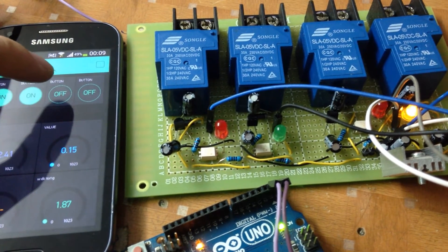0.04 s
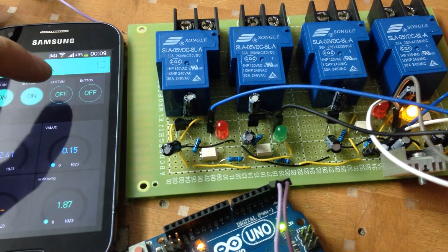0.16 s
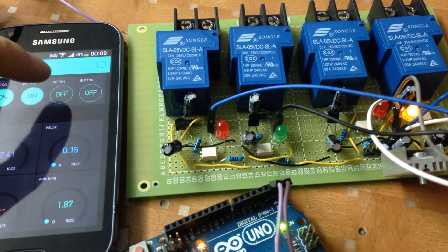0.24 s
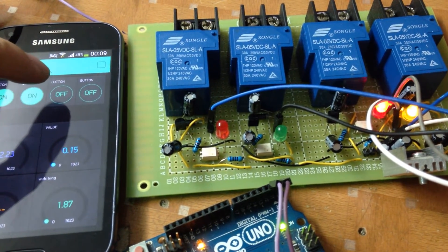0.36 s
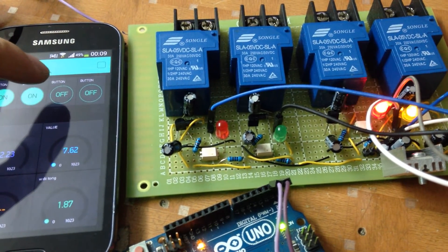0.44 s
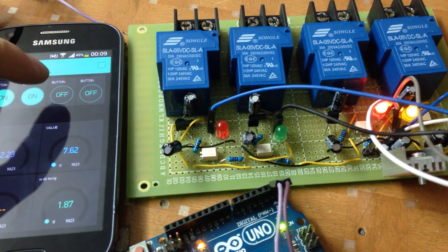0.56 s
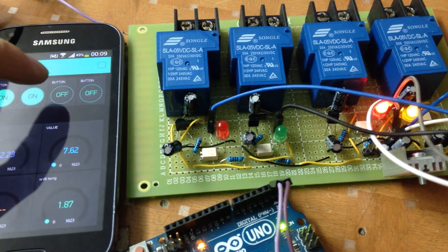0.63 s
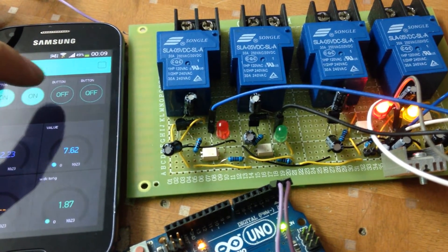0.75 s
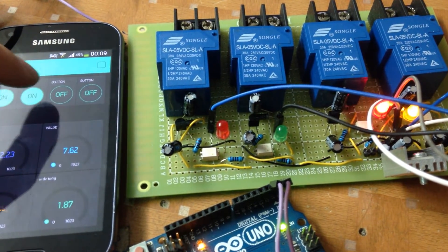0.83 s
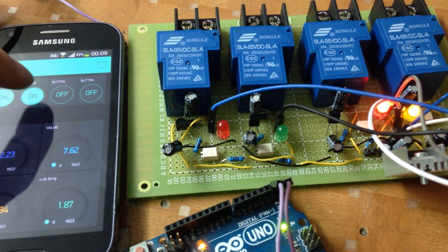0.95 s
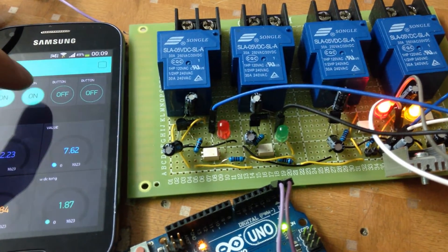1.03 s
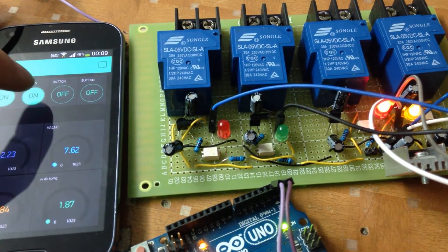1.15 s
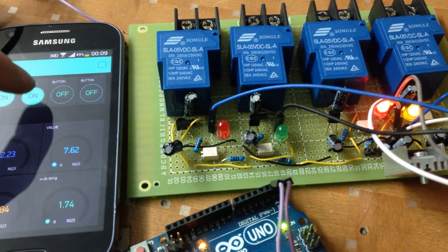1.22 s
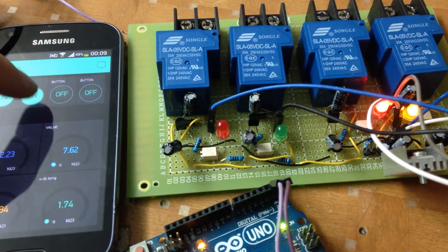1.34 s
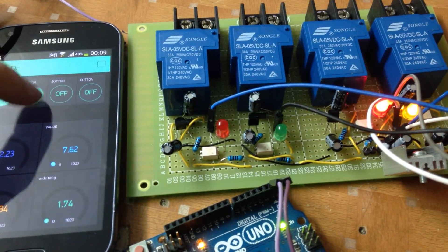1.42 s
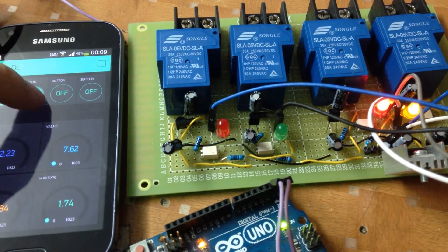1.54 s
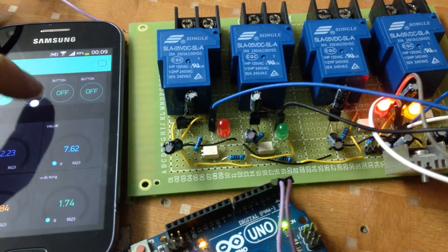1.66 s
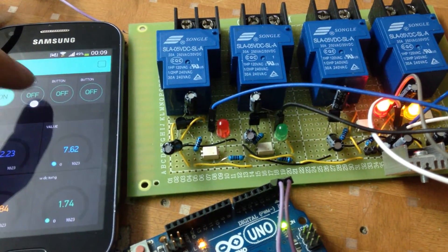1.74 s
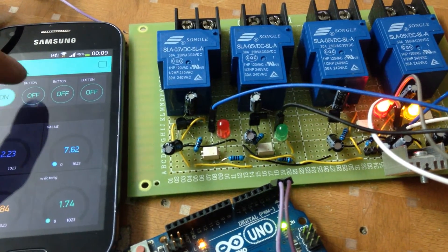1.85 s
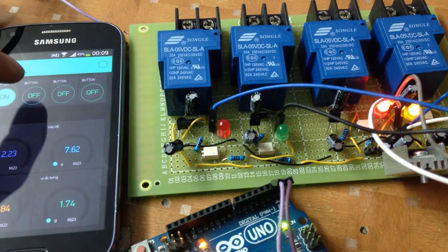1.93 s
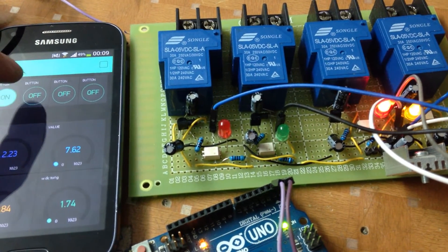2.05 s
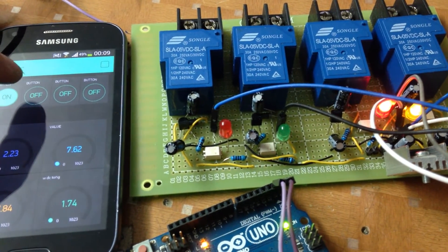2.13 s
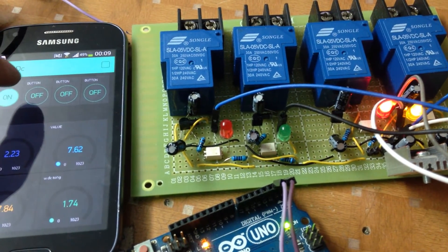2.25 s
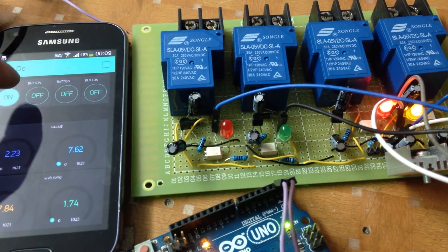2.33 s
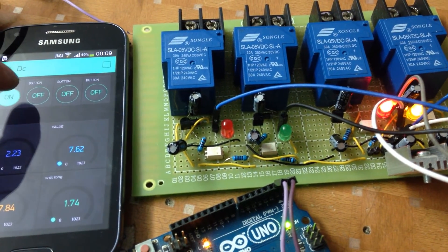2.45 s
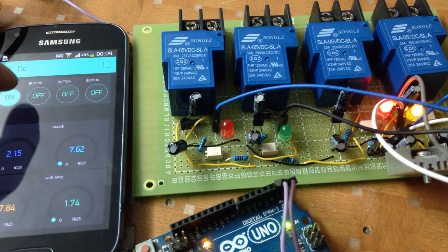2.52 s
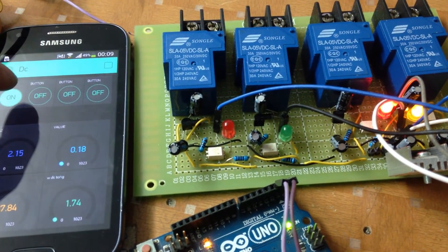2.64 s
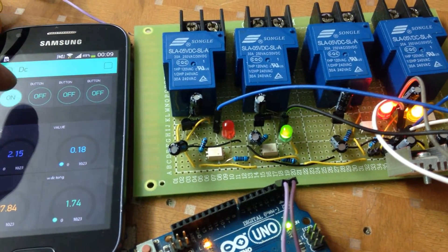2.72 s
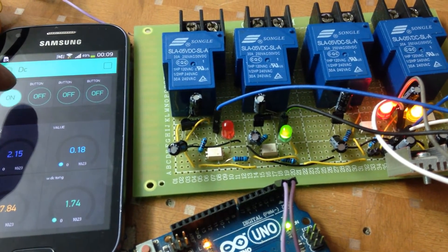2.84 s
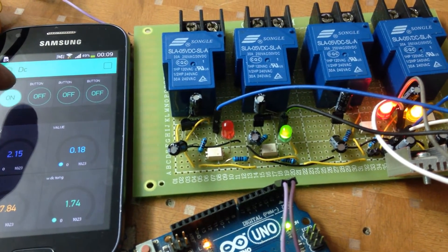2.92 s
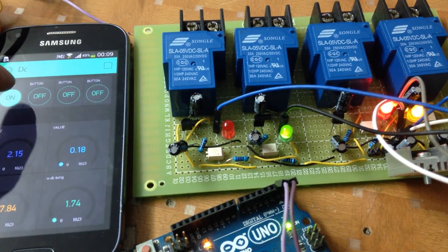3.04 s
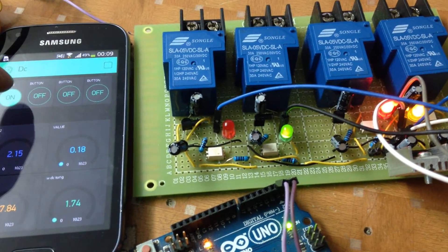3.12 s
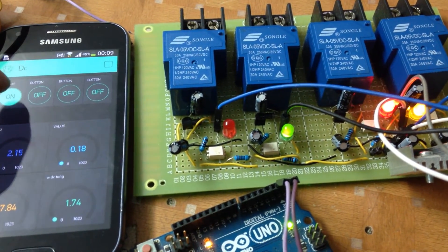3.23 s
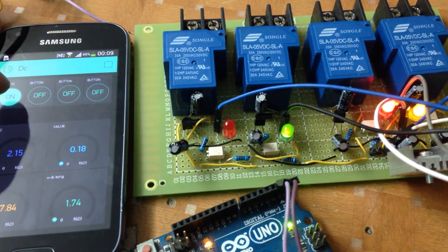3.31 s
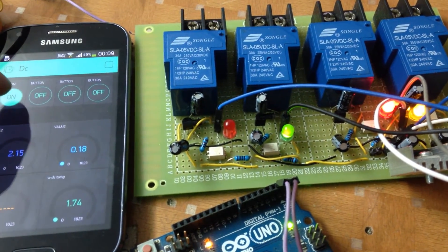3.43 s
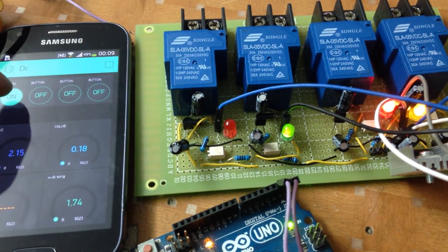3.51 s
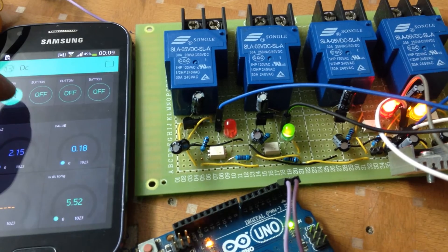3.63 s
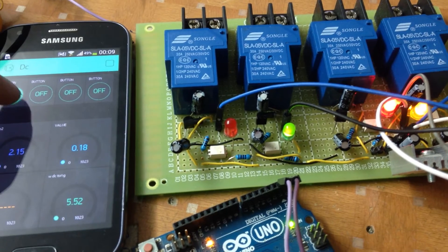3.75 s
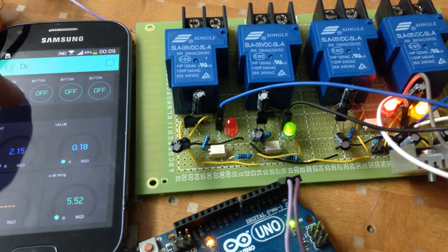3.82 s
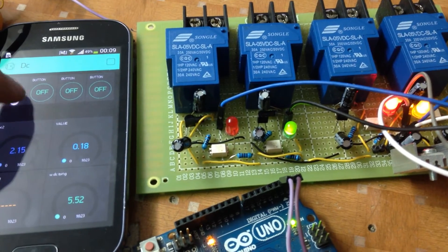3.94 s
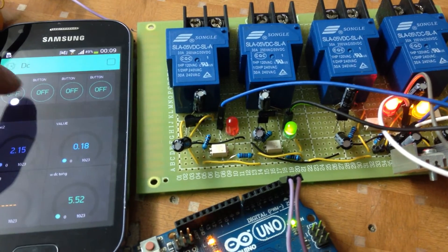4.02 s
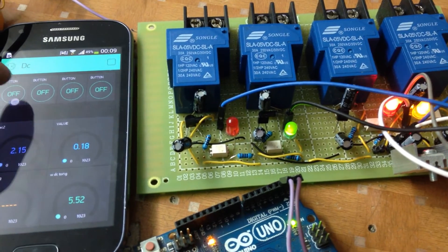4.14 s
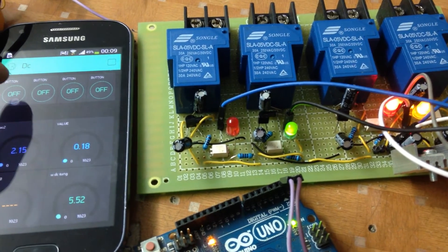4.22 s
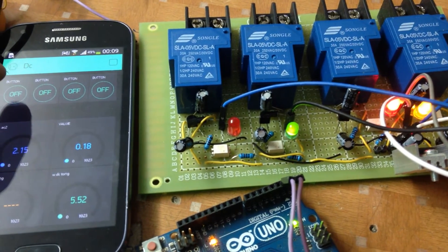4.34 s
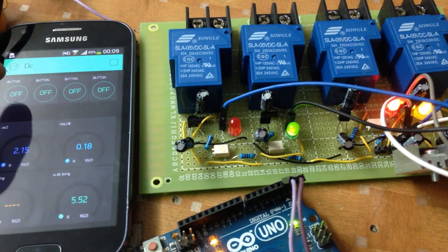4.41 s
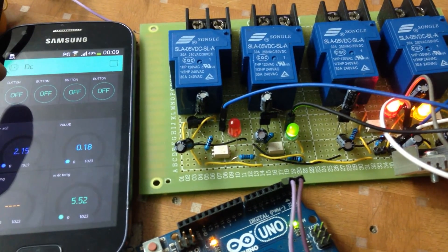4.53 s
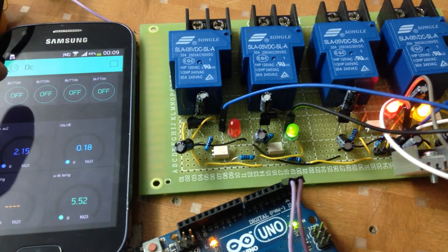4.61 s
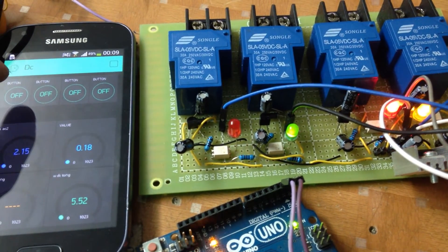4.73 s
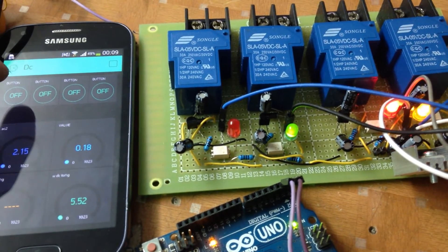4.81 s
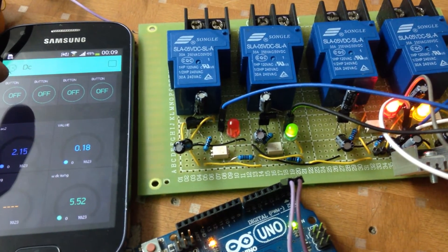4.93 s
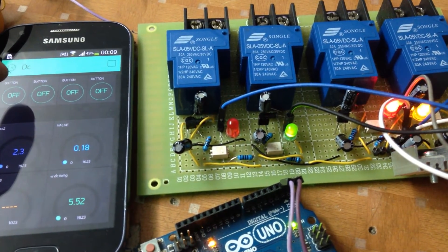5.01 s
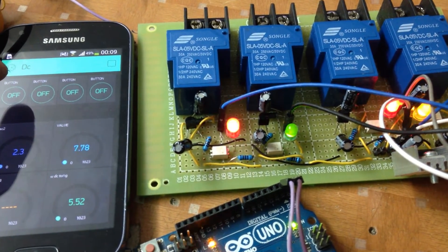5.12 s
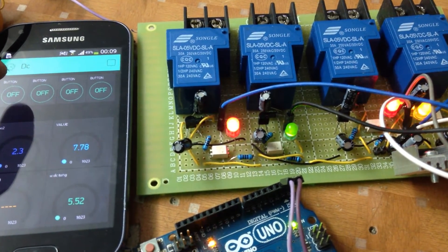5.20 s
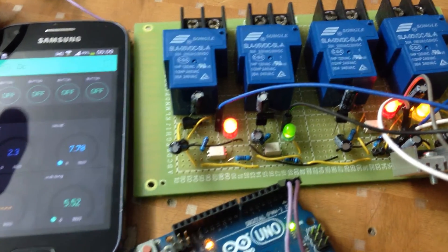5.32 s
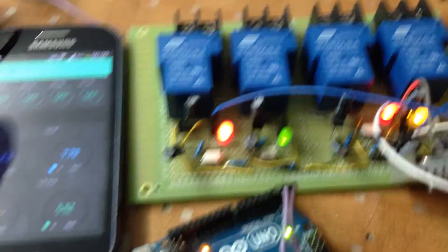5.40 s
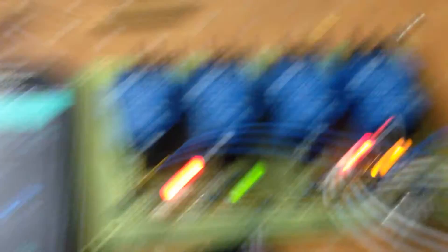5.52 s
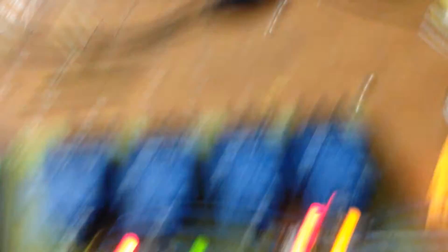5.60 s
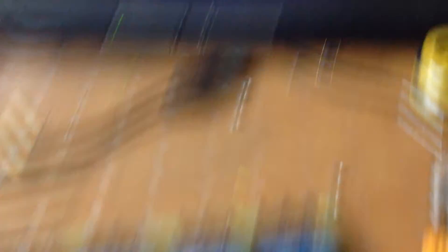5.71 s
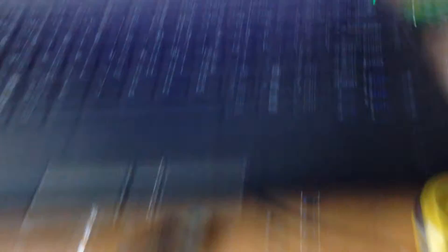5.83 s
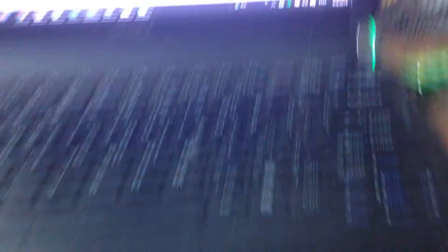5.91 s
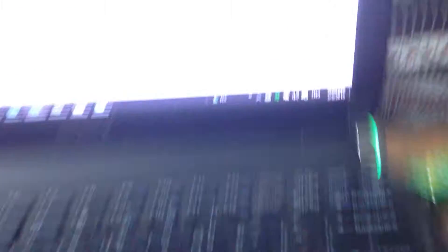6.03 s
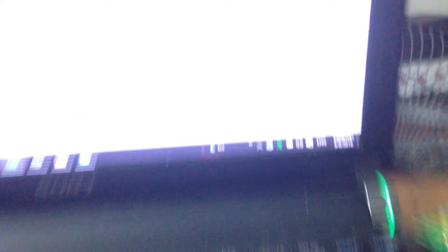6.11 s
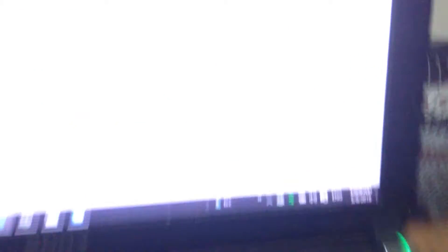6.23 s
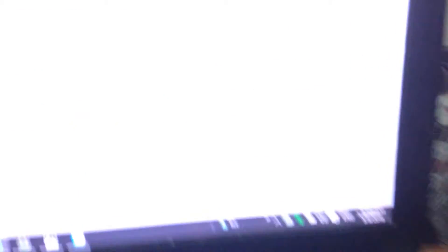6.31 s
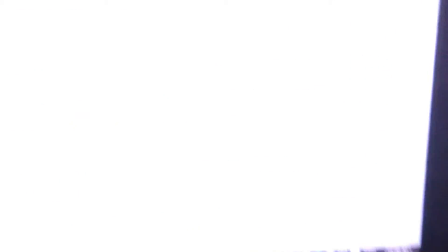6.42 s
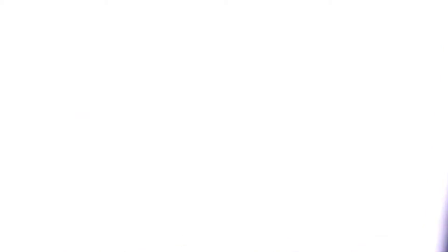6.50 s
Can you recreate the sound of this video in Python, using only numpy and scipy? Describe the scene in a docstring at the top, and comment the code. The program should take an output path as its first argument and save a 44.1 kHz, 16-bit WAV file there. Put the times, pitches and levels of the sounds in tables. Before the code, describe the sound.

A faint, low hum of cooling fans runs throughout, throbbing gently over a soft rush of air in a small room. A soft, low brush of handling opens the scene. At about 0.5 seconds a relay on a circuit board snaps shut close to the microphone: one sharp, bright, metallic click with a very short ring, far louder than the background. A second relay clicks at about 2.8 seconds and a third at about 5.1, each slightly different in tone. After each click the background dips briefly and creeps back. Between the last two, a faint low rumble swells, peaks near 3.9 seconds and ebbs. From about 5.2 seconds the microphone swings toward a laptop vent: the hum recedes slightly and a soft, airy hiss comes up, lasting until the end at about 6.6 seconds.

```python
"""Cooling fans hum, beat and rush through a duct; a soft brush of handling opens the scene.
At 0.47, 2.78 and 5.11 s three power relays on a circuit board pull in close to a phone's microphone:
each armature slams home, chatters for a few ms and rings in a small room; the gain ducks and creeps back.
Between the last two a low rumble swells and ebbs.
From 5.16 s the microphone swings from the fans to a laptop's vent, and its hiss comes up."""
import sys
import numpy as np
from scipy import signal
from scipy.fft import rfft, irfft
from scipy.io import wavfile
from scipy.ndimage import uniform_filter1d, minimum_filter1d

SR = 44100
rng = np.random.default_rng(int(sys.argv[2]) if len(sys.argv) > 2 else 0)


def wav_record(signal):
    """Record a signal, one row per channel, as 16-bit PCM in the file named by sys.argv[1]."""
    frames = np.transpose(np.atleast_2d(signal))
    bounded = np.clip(frames, -1, 1)
    # unit amplitude maps onto the largest positive 16-bit level
    quanta = np.round(bounded * 32767).astype(np.int16)
    wavfile.write(sys.argv[1], SR, quanta)


N = 289296
T = np.arange(N) / SR
HZ = np.fft.rfftfreq(N, 1 / SR)
CLICK_T = np.arange(2 * (SR // 5)) / SR
CLICK_HZ = np.fft.rfftfreq(len(CLICK_T), 1 / SR)

# fan's strong third order; the hum throbs deeply while it is up: time_s, level_db
THIRD_ORDER_LEVEL = [(0, -56.5), (0.6, -55), (2.2, -53.5), (2.6, -56), (3.05, -64), (3.7, -61), (4.5, -57),
                     (5.4, -58.5), (5.9, -54), (6.56, -57)]
# its other orders, the buzz: shaft_multiple, base_level_db
BUZZ_ORDERS = [(1, -79), (2, -66.5), (4, -69), (5, -66.5), (6, -66), (7, -72), (8, -72.5), (9, -70.5),
               (10, -82)]
# gain on the buzz: time_s, gain_db
BUZZ_GAIN = [(0.9, -3.5), (2, -0.5), (3.4, 2), (5, 0.5), (6.5, -1)]
# other fan tones, beating with the third order: pitch_hz, level_db
FAN_TONES = [(168.63, -62.5), (179.96, -70.5), (199.12, -54), (204.92, -65)]
# spectrum of the rushing air: freq_hz, relative_db
RUSH_SPECTRUM = [(20, -25), (50, -12), (100, -6), (160, 5), (280, 1), (400, -1), (700, -4), (1900, -0.5),
                 (2800, -4), (5300, -3), (8200, -2.5), (11000, -5), (14500, -12.5), (15600, -20)]
# duct resonances: centre_hz, width_hz, boost_db
DUCT_MODES = [(433, 38, 5.5), (687, 36, 2), (850, 83, 7.5), (1040, 35.63, 1.5), (1203, 83, 4),
              (1510, 81, 2), (1775, 150, 4), (2230, 193, 2.5), (3400, 380, 2), (5484, 356, 2),
              (8180, 590, 0.9)]
# vent hiss spectrum: freq_hz, relative_db
VENT_SPECTRUM = [(150, -7), (620, 1), (900, -10), (1350, 1.5), (2100, -2.5), (2800, -7), (3900, -1),
                 (8000, -1), (11000, -2.5), (15000, -14)]
# one closing per relay: touch_s, slam_db, first_bounce_s, bounce_loss_db
CLOSINGS = [(0.4660, -3, 0.0011, 3.5), (2.7830, -6.5, 0.00094, 1.5), (5.1100, -3.5, 0.00086, 7)]
# damped modes of each relay's frame and case: pitch_hz, base_width_hz, relative_db
CASE_MODES_A = [(1350, 400, -37), (2230, 200, -29), (3750, 260, -31), (4766, 216, -17), (5540, 260, -19),
                (6130, 290, -10), (6900, 200, -6), (8080, 290, -4), (8740, 300, -2), (9220, 260, -11),
                (10110, 260, 4), (11260, 260, -9), (12740, 350, -7), (13600, 400, -7), (14450, 260, -13)]
CASE_MODES_B = [(2270, 140, -31), (3030, 150, -33), (4044.5, 170, -24), (4700, 150, -22), (5280, 160, -19),
                (5630, 150, -16.5), (6490, 250, -8), (7500, 310, -3), (8400, 225, 2), (9450, 170, 1),
                (9900, 264, -4.5), (10860, 380, -5), (12800, 500, -8), (14000, 300, -11)]
CASE_MODES_C = [(2300, 246, -36), (3746, 240, -26), (4730, 270, -12.5), (5310, 240, -17), (7680, 170, 1.8),
                (8570, 280, -8.5), (9070, 250, -16), (9860, 247, -3), (10700, 360, -4.5),
                (11900, 440, -2.5), (14320, 260, -14.5)]
# lasting mode clusters of each spring and yoke: centre_hz, width_hz, relative_db, t60_s
SPRING_MODES_A = [(4707, 260, -23, .028), (4620, 420, -34.5, 0.16), (5970, 220, -35, .09),
                  (9400, 250, -35, .11), (10280, 300, -31.5, .17), (11200, 250, -37, .11)]
SPRING_MODES_B = [(4200, 1300, -27, 0.0364), (4625, 200, -33, 0.12), (5640, 260, -34, .09),
                  (8410, 380, -26, 0.17), (9780, 250, -35, .1), (12100, 800, -35.5, .11)]
SPRING_MODES_C = [(4760, 570, -18.5, 0.014), (4620, 300, -35, 0.12), (7650, 600, -36, .15),
                  (8700, 180, -35, .1), (12600, 700, -39.5, .11)]
# spectrum of each steel-on-steel crack: freq_hz, relative_db
CRACK_SPECTRUM_A = [(300, -50), (2700, -31.5), (3800, -27.5), (4700, -17), (6200, -1), (7400, -1.5),
                    (8800, -3), (10400, 0), (11800, -7), (13000, -1), (14400, -5.5), (15300, -21),
                    (16300, -30)]
CRACK_SPECTRUM_B = [(300, -50), (1800, -49), (3200, -21), (4700, -14), (5800, -14), (6700, 2), (9000, 1),
                    (11200, 0), (13000, -7), (14300, -8), (15300, -22), (16300, -34)]
CRACK_SPECTRUM_C = [(300, -50), (1700, -42), (2400, -34), (3600, -22), (4900, -11), (6300, -20), (7400, 3),
                    (9000, -1), (11500, -1), (13000, 0), (14700, -11), (15400, -17), (16300, -29)]
# room decay: freq_hz, t60_s
ROOM_DECAY = [(500, 0.14), (4500, 0.184), (9000, 0.31), (15000, 0.204)]
# noise band that shifts as the microphone moves: time_s, centre_hz, level_db
AIRY_BAND_PATH = [(5.2, 1705, -78), (5.5, 1600, -59), (5.9, 1750, -61.5), (6.1, 1950, -57.5),
                  (6.33, 1448, -59.5), (6.56, 1468, -55)]


def amp(db):
    """Decibels to gain."""
    return 10 ** (np.asarray(db) / 20)


def at_hz(table, hz):
    """Table lookup on a log-frequency axis."""
    freq_hz, value = np.transpose(table)
    return np.interp(np.log(hz + 1), np.log(freq_hz), value)


def resonance(centre_hz, width_hz):
    """Gain of one resonance over HZ."""
    return 1 / (1 + (2 * (HZ - centre_hz) / width_hz) ** 2)


def noise(spectrum):
    """Shaped noise, unit rms."""
    x = irfft(rfft(rng.standard_normal(2 * (len(spectrum) - 1))) * spectrum)
    return x / np.sqrt(np.mean(x ** 2) + 1e-20)


def drift(rate_hz):
    """Random wander, unit rms."""
    return noise(np.exp(-(HZ / rate_hz) ** 2))


def fan_hum(shaft_hz=63.22, in_step_s=2.44, speed_waver=0.00017, flutter_db=1.0):
    """Near-steady fan tones throb as they slip in and out of step, and flutter in the draught."""
    def turns(hz):
        return hz * (T - in_step_s + speed_waver * np.cumsum(drift(2.0)) / SR)

    def tone(cycles, db):
        return np.sqrt(2) * amp(db + flutter_db * drift(5.5)) * np.sin(2 * np.pi * (cycles + offset))

    offset = rng.random()
    shaft = turns(shaft_hz)
    third = tone(3 * shaft, np.interp(T, *np.transpose(THIRD_ORDER_LEVEL)))
    buzz = sum(tone(round(order) * shaft + rng.random(), db) for order, db in BUZZ_ORDERS)
    buzz *= amp(np.interp(T, *np.transpose(BUZZ_GAIN)))
    return third + buzz + sum(tone(turns(hz), db) for hz, db in FAN_TONES)


def duct_rush(level_db=-47):
    """Rushing air, coloured by the duct's resonances."""
    duct_db = sum(db * resonance(hz, width_hz) for hz, width_hz, db in DUCT_MODES)
    return amp(level_db) * noise(amp(at_hz(RUSH_SPECTRUM, HZ) + duct_db))


def air_drone(level_db=-67):
    """Narrow, unsteady drone of air around the strongest fan tones."""
    return amp(level_db) * noise(resonance(centre_hz=193, width_hz=16))


def handling_brush(peak_db=-48.5, attack_s=0.06, t60_s=0.59):
    """One soft, low brush of handling."""
    envelope = np.minimum(T / attack_s, 1) * amp(peak_db - 60 * np.maximum(T - attack_s, 0) / t60_s)
    return envelope * noise(resonance(centre_hz=351, width_hz=280))


def pull_in(touch_s, slam_db, bounce_s, loss_db, flight_s=0.0108, overtravel_s=0.0005607):
    """Blows (time_s, level_db): the contact scrapes off its rest and touches; slam; three bounces."""
    scrape_step_s, scrape_db, bounce_shrink = 0.00088, -39, 0.9
    blows = [(touch_s - flight_s + k * scrape_step_s, scrape_db) for k in range(3)]
    blows += [(touch_s, slam_db - 3), (touch_s + overtravel_s, slam_db)]
    for k in range(3):
        last_s, last_db = blows[-1]
        blows.append((last_s + bounce_s * bounce_shrink ** k, last_db - loss_db))
    return blows


def ringing(blows, t, t60_s, rise_s=0.00015):
    """Envelope of a part whose energy is topped up by each blow, then decays."""
    energy = sum(amp(db - 60 * np.maximum(t - s, 0) / t60_s) ** 2 * np.clip((t - s) / rise_s, 0, 1)
                 for s, db in blows)
    return np.sqrt(energy)


def relay(blows, case_modes, spring_modes, crack_spectrum,
          case_db, crack_db, crack_t60_s, damping, desk_db, tail_db):
    """The chattering armature drives a noisy crack, a short case ring and a rough spring ping."""
    def case():
        return sum(envelope * np.sin(2 * np.pi * (hz * t + rng.random())) for hz, envelope in rings)

    def crack():
        return crack_envelope * noise(amp(at_hz(crack_spectrum, CLICK_HZ)))

    start = round(blows[0][0] * SR)
    t = start / SR + CLICK_T
    t60_times_width = np.log(1000) / np.pi
    rings = [(hz, amp(case_db + db) * ringing(blows, t, t60_times_width / (width_hz * damping)))
             for hz, width_hz, db in case_modes]
    crack_envelope = amp(crack_db) * ringing(blows, t, crack_t60_s)
    ping = 0
    for hz, width_hz, db, t60_s in spring_modes:
        cluster = noise(np.exp(-2 * ((CLICK_HZ - hz) / width_hz) ** 2))
        ping += amp(db) * ringing(blows, t, t60_s) * cluster
    case_to_room_db = -10.5  # the case beams at the microphone, so the room gets less
    directions = 6  # each with its own crack and path: a dense, even tail
    echoes = sum(room(crack() + amp(case_to_room_db) * case(), tail_db, desk_db)
                 for _ in range(directions))
    click = case() + crack() + ping + echoes / np.sqrt(directions)
    return np.pad(click, (start, N))[:N]


def room(x, tail_db, desk_db, desk_t60_s=0.057):
    """Echoes only: quick scatter off desk and board, then a tail decaying band by band."""
    t = CLICK_T
    hz, frame_s, bands = signal.stft(rng.standard_normal(len(t)), SR, nperseg=256)
    bands *= amp(-60 * frame_s / at_hz(ROOM_DECAY, hz)[:, None])
    tail = signal.istft(bands, SR, nperseg=256)[1][:len(t)]
    tail *= np.clip((t - 0.003) / 0.0024, 0, 1)
    desk = rng.standard_normal(len(t)) * amp(-60 * t / desk_t60_s) * (t > 0.0015)
    response = amp(tail_db) * tail / np.linalg.norm(tail) + amp(desk_db) * desk / np.linalg.norm(desk)
    return signal.fftconvolve(x, response)[:len(t)]


def rumble(peak_db=-58.5, peak_s=3.9, width_s=1.12, waver_db=0.5):
    """Low noise that swells once and ebbs, wavering."""
    swell = amp(peak_db + waver_db * drift(2.03)) / np.sqrt(1 + ((T - peak_s) / width_s) ** 2)
    spectrum = resonance(61.15, 16) + resonance(121.6, 34.4) + 0.36 * resonance(386, 96)
    return swell * noise(spectrum)


def mic_swing(start_s=5.16, length_s=0.96):
    """Eased microphone position: 0 at the fans, 1 at the vent."""
    return np.sin(np.pi / 2 * np.clip((T - start_s) / length_s, 0, 1)) ** 2


def vent_hiss(swing, far_db=-62, near_db=-49):
    """Air from the vent, louder as the microphone nears."""
    return np.interp(swing, [0, 1], amp([far_db, near_db])) * noise(amp(at_hz(VENT_SPECTRUM, HZ)))


def airy_band(spread_hz=420):
    """Soft noise band; swells and wanders lower as the microphone nears the vent."""
    time_s, centre_hz, level_db = np.transpose(AIRY_BAND_PATH)
    carrier = np.exp(2j * np.pi * np.cumsum(np.interp(T, time_s, centre_hz)) / SR)
    band = (drift(spread_hz) + 1j * drift(spread_hz)) * carrier
    return amp(np.interp(T, time_s, level_db)) * band.real


def gain_control(x, threshold_db=-15.5, max_cut_db=10, attack_s=0.0077, recovery_s=0.75):
    """A loud peak cuts the gain by a bounded amount; it creeps back."""
    power_db = 10 * np.log10(abs(uniform_filter1d((x ** 2).mean(0), size=64)) + 1e-12)
    cut_db = np.clip(power_db - threshold_db, 0, max_cut_db)
    fade = np.exp(-T / recovery_s)
    held_db = np.maximum.accumulate(cut_db / fade) * fade
    pole = np.exp(-1 / (attack_s * SR))
    return x * amp(-signal.lfilter([1 - pole], [1, -pole], held_db))


def limiter(x, ceiling=0.72):
    """Brief gain dip around any peak over the ceiling."""
    allowed = ceiling / np.maximum(abs(x).max(0), ceiling)
    return x * uniform_filter1d(minimum_filter1d(allowed, size=25), size=25)


def scene():
    """Three relays over fans and air, the same in both channels."""
    blows_a, blows_b, blows_c = (pull_in(*row) for row in CLOSINGS)
    clicks = relay(blows_a, CASE_MODES_A, SPRING_MODES_A, CRACK_SPECTRUM_A, case_db=-3, crack_db=-3.5,
                   crack_t60_s=0.00546, damping=1.3, desk_db=-12.5, tail_db=-14.5)
    clicks += relay(blows_b, CASE_MODES_B, SPRING_MODES_B, CRACK_SPECTRUM_B, case_db=-3.5, crack_db=-3,
                    crack_t60_s=0.0054, damping=1.595, desk_db=-9, tail_db=-13)
    clicks += relay(blows_c, CASE_MODES_C, SPRING_MODES_C, CRACK_SPECTRUM_C, case_db=-3, crack_db=-2,
                    crack_t60_s=0.00528, damping=1.34, desk_db=-9, tail_db=-12.5)
    swing, fans_away_db = mic_swing(), -2
    fans = amp(fans_away_db * swing) * (fan_hum() + duct_rush())
    mono = clicks + fans + rumble() + vent_hiss(swing) + handling_brush() + air_drone() + airy_band()
    return np.array([mono, mono])


def record(dry):
    """Gain control, peak limiter, 15.7 kHz low-pass."""
    lowpass = signal.firwin(255, 15700, window=("kaiser", 9), fs=SR)
    return signal.oaconvolve(limiter(gain_control(dry)), lowpass[None], "same")


dry = scene()
out = record(dry)
wav_record(out)
```